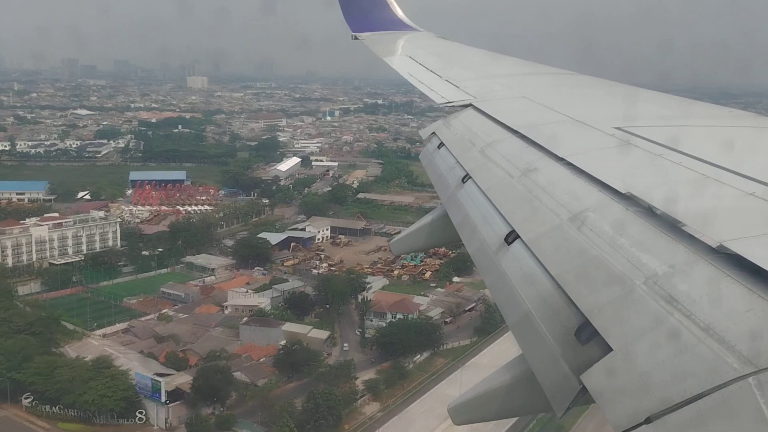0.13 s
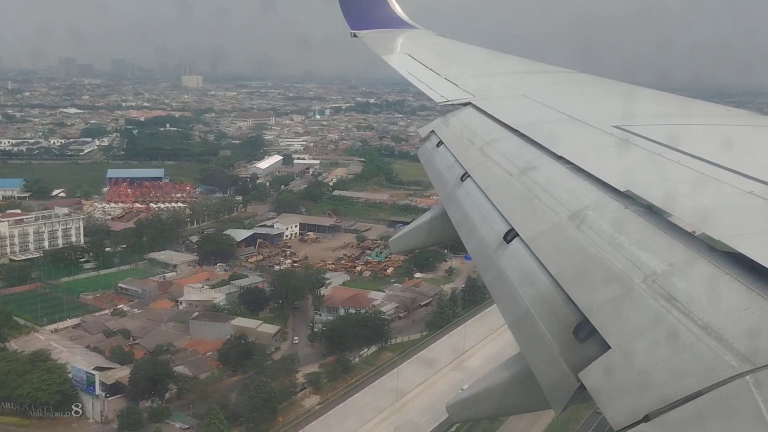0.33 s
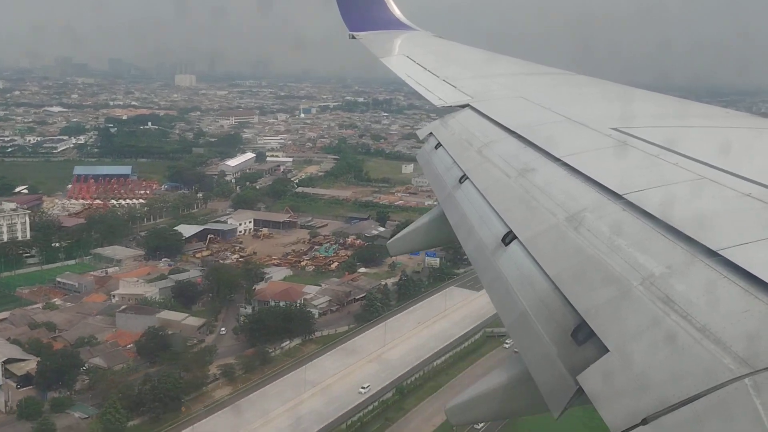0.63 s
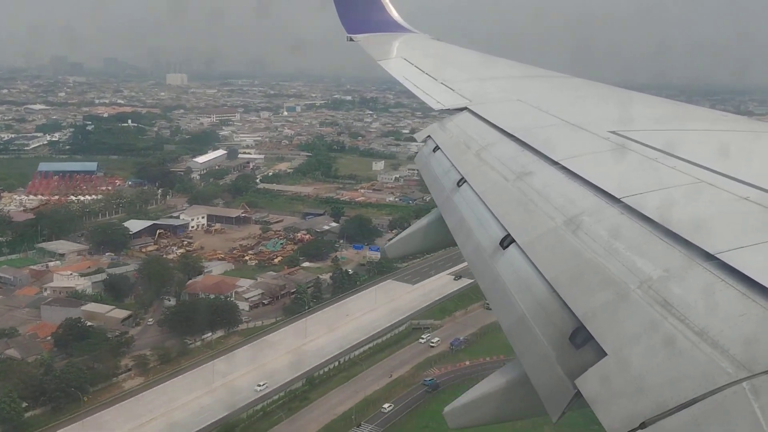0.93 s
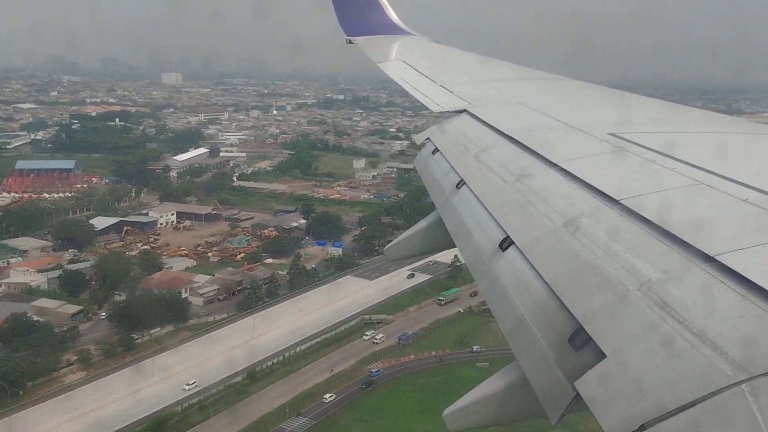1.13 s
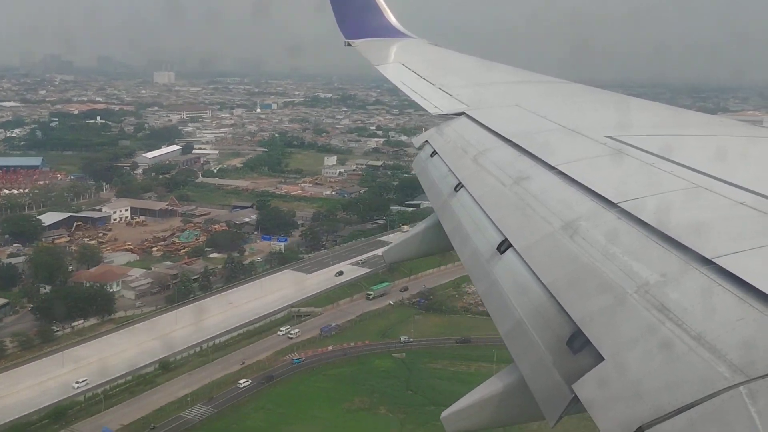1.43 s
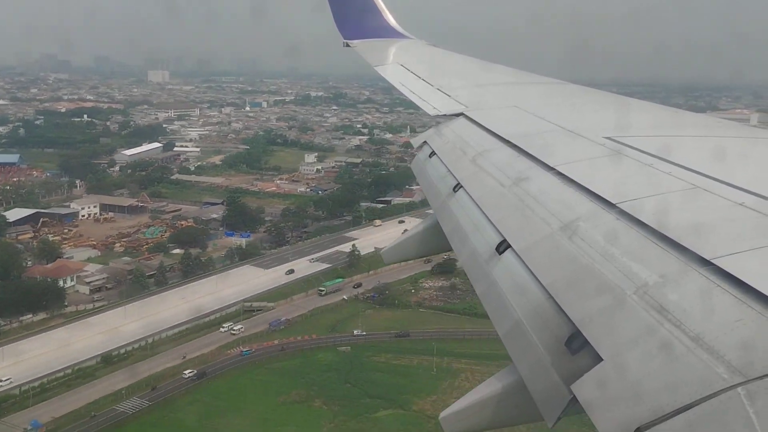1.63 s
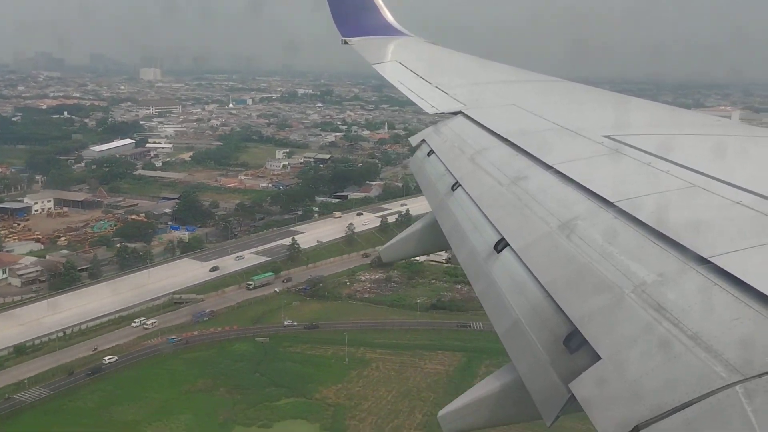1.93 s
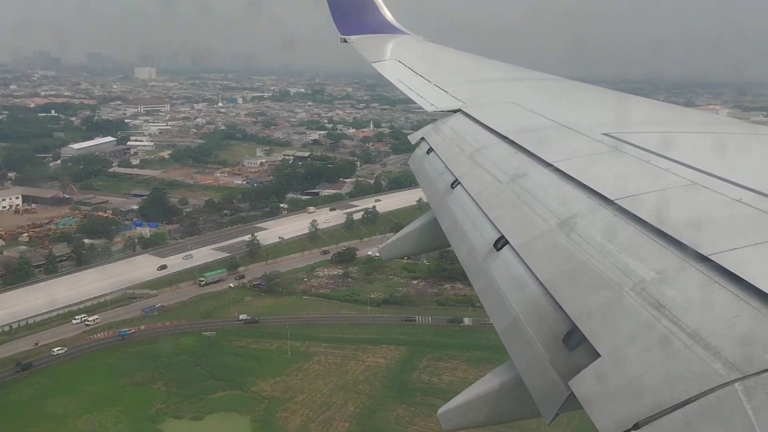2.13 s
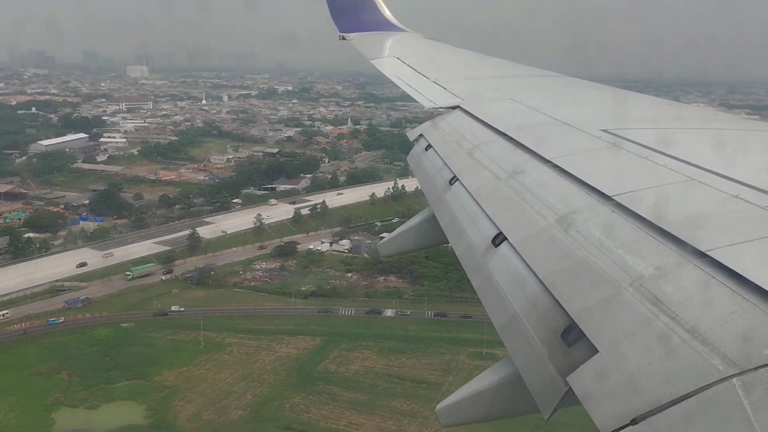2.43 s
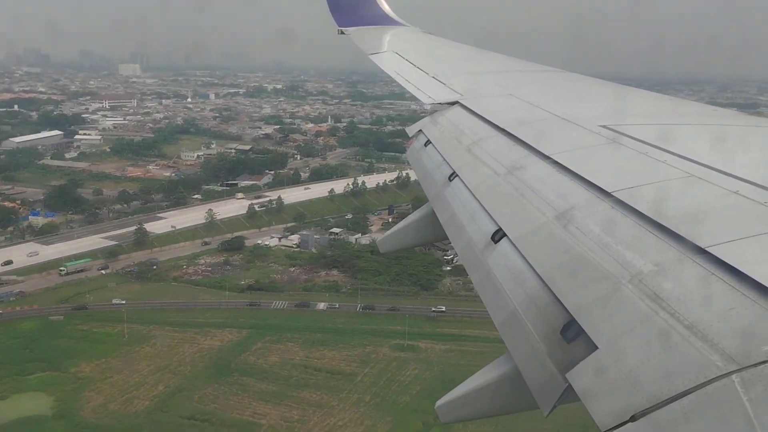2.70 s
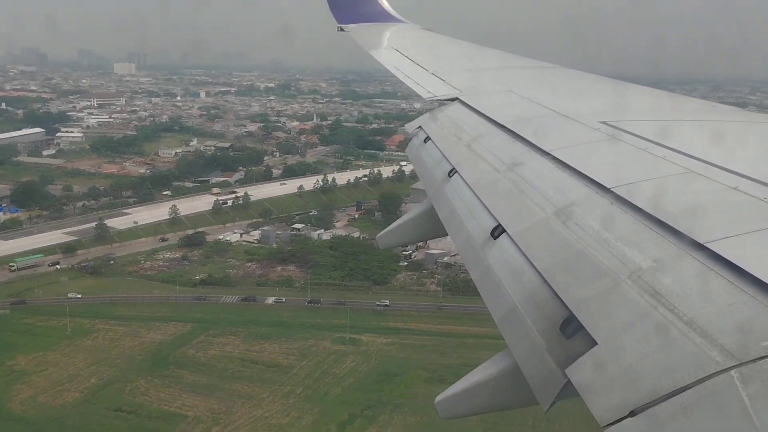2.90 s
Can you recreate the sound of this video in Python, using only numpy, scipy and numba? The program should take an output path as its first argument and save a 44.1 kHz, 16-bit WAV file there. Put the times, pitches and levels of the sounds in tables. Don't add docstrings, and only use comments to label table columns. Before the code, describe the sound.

Airliner cabin roar, deep and constant, with soft low buffets and tiny close ticks and rubs

```python
import sys
import numpy as np
from scipy import signal
from scipy.fft import rfft, irfft
from scipy.io import wavfile
from scipy.ndimage import uniform_filter1d
from numba import njit

SR = 44100
rng = np.random.default_rng(int(sys.argv[2]) if len(sys.argv) > 2 else 0)


def master(y):
    cut = np.clip(np.atleast_2d(y).T, -1, 1)
    pcm = np.round(cut * 32767)
    wavfile.write(sys.argv[1], SR, pcm.astype(np.int16))


def invert_db(level):
    return 10 ** (np.asarray(level, dtype=float) / 20)


N = 134946
T = np.arange(N) / SR
HZ = np.fft.rfftfreq(N, 1 / SR)


def read(table):
    table = np.array(table, float)
    return np.interp(np.log(HZ + 30), np.log(table[:, 0] + 30), table[:, 1])


def unit(x):
    return x / np.sqrt(np.mean(x ** 2))


def peak(hz, width_hz):
    return 1 / (1 + (2 * (HZ - hz) / width_hz) ** 2)


def walk(rate_hz):
    hold = int(SR / rate_hz)
    steps = np.repeat(rng.standard_normal(N // hold + 1), hold)
    smooth = uniform_filter1d(uniform_filter1d(steps, hold), hold)
    return unit(smooth[:N])


def panned(db, pan_db):
    return db + np.array([[pan_db], [-pan_db]]) / 2


def ports(gain, alike=None):
    # (frequency [Hz], likeness [0-1])
    likeness = [(40, .998), (70, .985), (110, .97), (180, .974), (290, .87), (520, .81), (800, .31),
                (1800, .41), (5000, .25)]
    # (frequency [Hz], left minus right [dB])
    lean_table = [(300, .1), (500, 1.6), (800, 1.1), (1100, -6.4), (1600, -6.8), (2600, -1.4), (3600, -4.5),
                  (5200, -.3)]
    lag_s, lag_from_hz = 0.00038, 600
    shared, left, right = rfft(rng.standard_normal((3, N)))
    c = np.clip(read(likeness) if alike is None else alike, 0, 1)
    lag = lag_s * HZ ** 3 / (HZ ** 3 + lag_from_hz ** 3)
    turn = np.exp(-1j * np.pi * HZ * lag)
    lean = invert_db(read(lean_table) / 2)
    left = lean * (np.sqrt(c) * shared * turn + np.sqrt(1 - c) * left)
    right = (np.sqrt(c) * shared / turn + np.sqrt(1 - c) * right) / lean
    return irfft(np.array([left, right]) * gain, N)


def air(table, level_db, swell_db, flicker_db, gust):
    # (frequency [Hz], width [Hz], lift [dB])
    panels = [(46, 21, 0.5), (71.3, 32, 3.5), (81.5, 6.7, -6), (110, 29, -1), (192, 4.2, -6.5),
              (233, 44, 2), (331.6, 22, 2.5), (531, 38, 2.5), (310, 420, 0.97), (39, 8, 0)]
    lift_db = sum(db * peak(hz, width_hz) for hz, width_hz, db in panels)
    inside = (HZ >= table[0][0]) & (HZ < table[-1][0])
    pair = ports(invert_db(read(table) + lift_db) * inside)
    motion_db = swell_db * gust + flicker_db * walk(17)
    return pair / np.std(pair.mean(axis=0)) * invert_db(level_db + motion_db)


def fuselage_roar(gust):
    # (frequency [Hz], level [dB per Hz])
    roar_table = [(15, -23), (29, -9.5), (45, 0), (81, -4.5), (112, 1), (226, -3), (462, -16.5),
                  (700, -24.5)]
    return air(roar_table, level_db=-13.1, swell_db=.4, flicker_db=.15, gust=gust)


def low_swells(roar):
    # (centre [s], length [s], lift [dB])
    swells = [
        (.1, .1, 4.5),
        (0.514, 0.043, 13.5),
        (1.267, 0.05, -7.5),
        (1.55, 0.067, -5),
        (1.798, 0.13, 7.5),
        (1.954, 0.09, 6),
        (2.256, 0.095, 12.5),
        (2.533, 0.066, -7),
        (2.82, 0.18, 3.5),
    ]
    top_hz = 66.4
    low = irfft(rfft(roar) / (1 + (HZ / top_hz) ** 6), N)
    lift_db = sum(db * np.exp(-2 * ((T - s) / length) ** 2) for s, length, db in swells)
    return roar + low * (invert_db(lift_db) - 1)


def window_rush(gust):
    # (frequency [Hz], level [dB per Hz])
    rush_table = [(700, -.6), (900, 1.4), (1250, -6.4), (1600, -9.6), (2200, -15.4), (3000, -20.8),
                  (4150, -25.2), (5500, -34)]
    return air(rush_table, level_db=-39, swell_db=.3, flicker_db=.5, gust=gust)


def rubs():
    # (frequency [Hz], width [Hz], level [dB])
    bright_peaks = [(8600, 900, 0), (7300, 900, -6), (9800, 2000, -7), (13000, 4000, -18), (6000, 800, -9)]
    low_peaks = [(3750, 450, 0), (4600, 500, -4), (2900, 600, -5), (6000, 700, -9)]
    # (centre [s], length [s], level [dB], share of low rub [dB])
    strokes = [(.16, .08, -67, -4), (.72, .12, -70, -6), (1.213, .028, -54, -5), (1.35, .05, -68, 6),
               (1.44, .04, -63, -6), (2.02, .09, -60, -8), (2.125, .03, -65, -3), (2.218, .012, -57, -5),
               (2.253, .022, -58, -4), (2.278, .012, -61, -6), (2.527, .045, -58, 4), (2.812, .012, -60, 2),
               (2.93, .05, -65, 0), (3.0, .04, -66, 2)]
    tail_share, grit_db = .2, 1.5

    def friction(peaks):
        color = sum(invert_db(db) * peak(hz, width_hz) for hz, width_hz, db in peaks)
        return unit(ports(color, 0.16))

    bright = friction(bright_peaks)
    low = friction(low_peaks)
    out = 0
    for s, length, db, low_db in strokes:
        u = (T - s) / length
        swell = np.exp(-4 * u ** 2)
        swell = swell + tail_share * (u > 0) * (1 - swell) * np.exp(-np.abs(u))
        out = out + swell * invert_db(db) * (bright + invert_db(low_db) * low)
    return out * invert_db(grit_db * walk(300))


def ticks():
    # (time [s], level [dB], left minus right [dB])
    cracks = [(.0955, -45, -8), (.19, -58, 5), (.56, -57, -5), (1.482, -58, 0), (2.214, -51, -2),
              (2.2455, -51, -2), (1.1975, -57, -3), (1.2025, -55, -3), (1.2185, -53, 0), (2.2565, -56, 0),
              (2.2715, -53, 0), (2.508, -54, -1), (2.514, -57, 0), (2.525, -54, -1), (2.543, -58, 0),
              (2.952, -58, -1), (2.38, -59, 0), (2.79, -57, -5), (2.809, -47.5, -2), (2.924, -53, -3)]
    decay_s, low_hz, high_hz = .0012, 4000, 9500
    color = HZ ** 2 / (HZ ** 2 + low_hz ** 2) / (1 + (HZ / high_hz) ** 3)
    noise = unit(ports(color, .6))
    envelope = 0
    for s, db, pan_db in cracks:
        decay = (T > s) * np.exp(-np.abs(T - s) / decay_s)
        envelope = envelope + decay * invert_db(panned(db, pan_db))
    return noise * envelope


def squeaks():
    # (centre [s], frequency [Hz], level [dB], length [s])
    rings = [(1.204, 8750, -57, .008), (1.217, 8450, -56, .01), (1.222, 3900, -58, .015),
             (1.215, 7200, -61, .01), (2.2155, 8500, -57, .003), (2.249, 6500, -60, .005),
             (2.219, 12800, -69, .006), (2.247, 3800, -57, .004), (2.215, 3900, -58, .005),
             (2.272, 6000, -59, .003), (2.253, 9200, -61, .01), (1.22, 2800, -56, .006),
             (1.23, 3900, -59, .006), (2.51, 8300, -63, .006), (2.53, 2900, -56, .006),
             (2.53, 3700, -52, .014), (2.53, 4650, -59, .012), (2.528, 8100, -60, .008),
             (2.812, 4200, -57, .006), (2.811, 6000, -57, .005)]
    waver_hz, grit_db = 130, 2.5
    out = 0
    for (s, hz, db, length), turn in zip(rings, rng.random((len(rings), 2))):
        waver = np.cumsum(waver_hz * walk(350)) / SR
        phase = hz * T + waver + turn[:, None] / 3
        ring = np.sin(2 * np.pi * phase) * invert_db(grit_db * walk(500))
        out = out + invert_db(db) * ring * np.exp(-2 * ((T - s) / length) ** 2)
    return out


def machines():
    # (frequency [Hz], level [dB], left minus right [dB], width [Hz])
    tones = [
        (877, -50, -3, 4),
        (1441, -51.5, -12, 2.5),
        (3698, -76, -3, 12),
        (480, -56, 0, 8),
        (956, -54, -6, 14),
        (2950, -76, -3, 14),
        (4127, -77, 0, 5),
        (8510, -84, 0, 20),
    ]
    level_waver_db = .8
    out = 0
    for hz, db, pan_db, width_hz in tones:
        turns = np.cumsum(hz + width_hz * walk(10) / 2) / SR
        port_phase = np.array([[hz * 0.0033], [0]])
        wave = np.sin(2 * np.pi * turns - 2 * np.pi * port_phase)
        level_db = panned(db + level_waver_db * walk(7), pan_db)
        out = out + np.sqrt(2) * wave * invert_db(level_db)
    return out


def vent_hiss(gust):
    # (frequency [Hz], level [dB per Hz])
    vent_table = [(5500, -2), (7000, -3), (8800, 0), (9600, -1.5), (11000, -10), (13000, -18.5),
                  (15000, -23), (17000, -25)]
    return air(vent_table, level_db=-62.6, swell_db=.3, flicker_db=.5, gust=gust)


def scene():
    gust = walk(3.4)
    flow = low_swells(fuselage_roar(gust)) + window_rush(gust)
    hands = invert_db(3.5) * rubs() + invert_db(4.5) * ticks() + invert_db(7) * squeaks()
    return flow + hands + machines() + vent_hiss(gust)


@njit
def follow(x, attack, release, start):
    e, out = start, np.empty(len(x))
    for i in range(len(x)):
        e += (x[i] - e) * (attack if x[i] > e else release)
        out[i] = e
    return out


def roll_off(x):
    return signal.sosfilt(signal.butter(12, 15750, fs=SR, output="sos"), x)


def record(dry):
    attack_s, release_s, ratio, makeup_db = 0.0037, 0.022, 2.19, 1.82
    smooth, end_fade_s = 150, .006
    top = float(invert_db(-16.5))
    level = follow(np.abs(dry).mean(axis=0), 1 / (attack_s * SR), 1 / (release_s * SR), top)
    gain = np.minimum(top / level, 1.6) ** (1 - 1 / ratio)
    gain = uniform_filter1d(gain, smooth, origin=-70)
    gain = uniform_filter1d(gain, smooth, origin=-40)
    fade = np.sin(np.pi / 2 * np.clip((T[-1] - T) / end_fade_s, 0, 1)) ** 2
    return roll_off(dry * gain * invert_db(makeup_db) * fade)


dry = scene()
out = record(dry)
master(out)
```